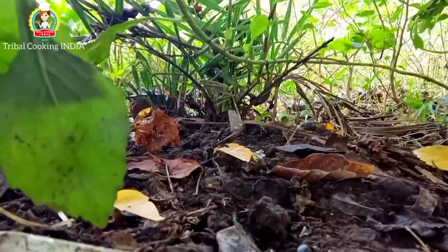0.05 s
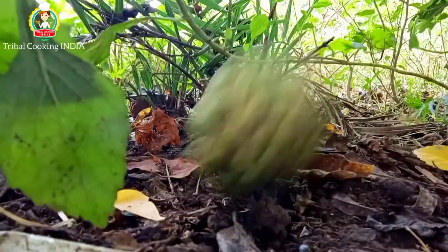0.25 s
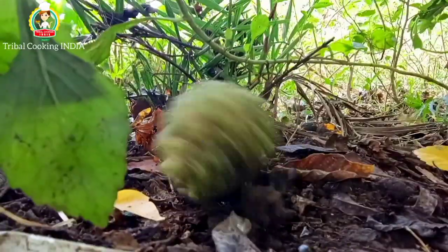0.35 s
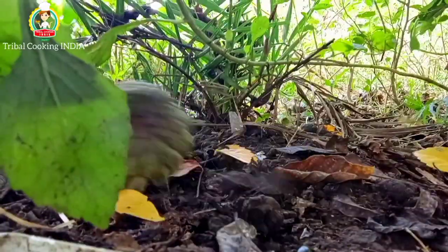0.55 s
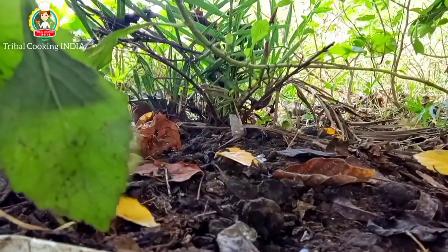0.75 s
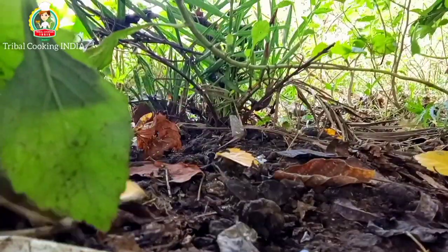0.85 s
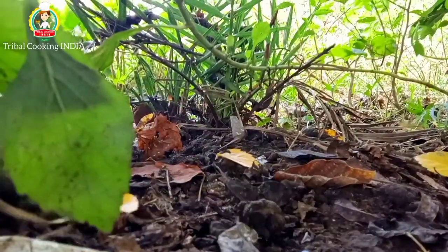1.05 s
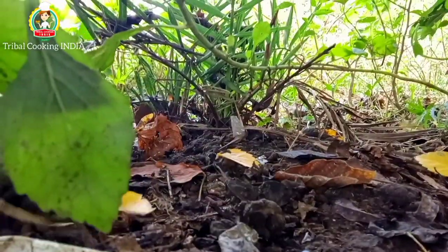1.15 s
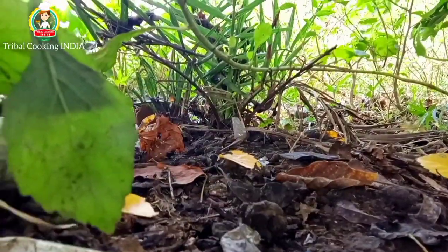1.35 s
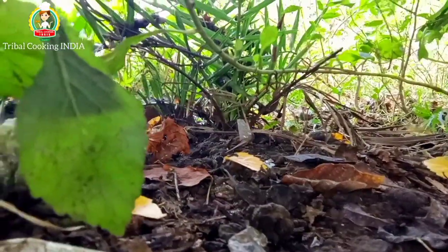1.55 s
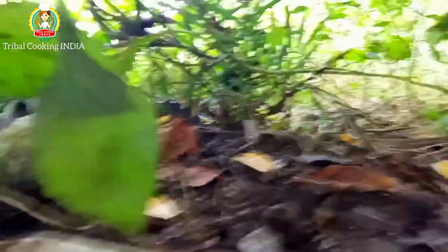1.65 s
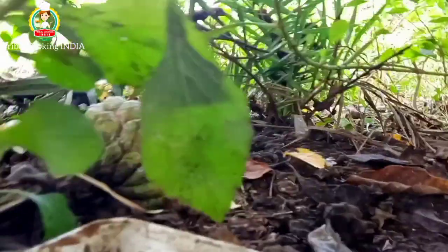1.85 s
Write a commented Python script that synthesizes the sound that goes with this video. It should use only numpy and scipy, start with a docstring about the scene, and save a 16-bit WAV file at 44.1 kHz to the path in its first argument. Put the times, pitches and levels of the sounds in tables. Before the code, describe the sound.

A heavy fruit thuds onto soil close by at about 0.2 seconds, the loudest sound, after a brief rustle of dry leaves. It bounces faintly at 0.4 seconds and rolls off through crunching leaves. Softer rustling continues over a light outdoor wind rumble, with small twig snaps, one clear at 0.8 seconds. Around 1.8 seconds the rustle and rumble swell briefly with a few more snaps.

```python
"""Dry leaves rustle and twigs snap, then a heavy round fruit thuds onto soil close by, bounces once
and rolls off through the litter. The impact excites the fruit's damped modes; each twig fractures
with a ringing crack, and the leaves give noise bursts over a bed of countless tiny cracks.
Light wind and the rolling rumble underneath, and the rustle swells again at the end."""
import sys
import numpy as np
from scipy import signal
from scipy.fft import rfft, irfft
from scipy.io import wavfile

SR = 44100
rng = np.random.default_rng(int(sys.argv[2]) if len(sys.argv) > 2 else 0)


def wav_record(signal):
    """Record a signal, one row per channel, as 16-bit PCM in the file named by sys.argv[1]."""
    frames = np.transpose(np.atleast_2d(signal))
    bounded = np.clip(frames, -1, 1)
    # unit amplitude maps onto the largest positive 16-bit level
    quanta = np.round(bounded * 32767).astype(np.int16)
    wavfile.write(sys.argv[1], SR, quanta)


N = 83790

# spectrum of crushed leaves and splinters (frequency [Hz], relative level [dB])
CRUSH_SPECTRUM = [(100, -31), (450, -22.5), (800, -0.5), (1200, 1.5), (1700, 2.5), (2500, -1.5),
                  (3700, 2.5), (4600, -14.5), (6000, -30.5), (15500, -44)]


def fruit_thud(level_db, slap_db):
    """Impact excites damped modes; the main one drops in pitch and level as the contact load comes off."""
    # overtones of the fruit (frequency [Hz], relative level [dB], 60 dB decay time [s])
    modes = [(305, -18, 0.02), (493, -18, 0.046), (1170, -15.5, 0.017), (1613, -21, 0.037),
             (3320, -29, 0.016)]
    contact_s, rise_s, lag_s, slap_s = 0.012, 0.0011, 0.00072, 0.00014
    pressed_hz, free_hz, free_db, free_t60 = 168.7, 130, -10.5, 0.064
    t = np.arange(SR // 5) / SR
    age = np.maximum(t - lag_s, 0)  # the vibration starts just after the skin's slap
    pressed = .5 - .5 * np.tanh((age - contact_s) / 0.00034)
    hz = free_hz + (pressed_hz - free_hz) * pressed
    phase = 2 * np.pi * np.cumsum(hz * (age > 0)) / SR
    load = .5 - .5 * np.tanh((age - contact_s * 0.86) / 0.001)
    envelope = load + (1 - load) * amp(free_db - 60 * (age - contact_s) / free_t60)
    fundamental = (1 - np.exp(-age / rise_s)) * envelope * np.sin(phase)
    overtones = sum(amp(db - 60 * t / t60) * np.sin(2 * np.pi * f * t) for f, db, t60 in modes)
    pulse = (t / slap_s) ** 2 * np.exp(2 - 2 * t / slap_s)
    slap = signal.sosfilt(signal.butter(3, 2020, fs=SR, output="sos"), pulse)  # soft soil dulls it
    return amp(level_db) * (fundamental - overtones) - amp(slap_db) * slap


def twig_snap(level_db, decay_s, centre_hz):
    """Brittle fracture: a damped oscillation of a few cycles, trailed by the noise of splinters."""
    decay_cycles, splinter_gain = 1.54, 0.52
    t = np.arange(SR // 25) / SR
    crack = np.sin(2 * np.pi * centre_hz * t) * np.exp(-t * centre_hz / decay_cycles)
    splinters = colour(rng.standard_normal(len(t)), CRUSH_SPECTRUM) * np.exp(-t / decay_s)
    band = signal.butter(5, [650, 3900], "bandpass", fs=SR, output="sos")
    return amp(level_db) * signal.sosfilt(band, crack + splinter_gain * splinters)


def leaf_crunch(decay_s, body_db, treble_db, peak_hz):
    """A crushed leaf radiates a noise transient: a dull body and a crisp spectral peak of its own."""
    # treble of a crushed leaf (frequency [Hz], relative level [dB])
    crisp_spectrum = [(2000, 4), (4500, 0), (6500, -6), (9000, 2), (12000, -11), (15500, -13.5)]
    rise_s, peak_db, half_width_hz = 0.0016, 8, 1150
    t = np.arange(SR // 8) / SR
    body, treble = rng.standard_normal((2, len(t)))
    hz = np.fft.rfftfreq(len(t), 1 / SR)
    peak = amp(peak_db / (1 + ((hz - peak_hz) / half_width_hz) ** 2))
    treble = colour(irfft(rfft(treble) * peak, len(t)), crisp_spectrum)
    envelope = np.minimum(t / rise_s, 1) * np.exp(-np.maximum(t - rise_s, 0) / decay_s)
    return envelope * (amp(body_db) * colour(body, CRUSH_SPECTRUM) + amp(treble_db) * treble)


def leaf_rustle():
    """Many leaves add incoherently into a grainy body with a finer crackle on top."""
    # envelope of the rustle (time [s], body level [dB], treble level [dB])
    levels = [(0, -34, -44.5), (.13, -36.5, -47.5), (.21, -36, -45.5), (.25, -33.5, -46), (.28, -34.5, -43),
              (.36, -36, -45.5), (.41, -34, -42.5), (.46, -37.5, -44.5), (0.548, -34, -44), (.60, -42, -50),
              (.69, -42, -54), (.78, -47, -57), (.85, -42, -55), (.92, -44.5, -53.5), (1.03, -41.5, -52),
              (1.14, -45.5, -55), (1.21, -41, -49.5), (1.25, -44, -51.5), (1.32, -38, -50.5),
              (1.38, -44, -58), (1.45, -40.5, -50), (1.58, -38.5, -49), (1.67, -39, -49.5),
              (1.75, -36.5, -48), (1.82, -32.5, -42), (1.86, -36, -47), (1.9, -33.5, -43.5)]
    # spectra of its two layers (frequency [Hz], relative level [dB])
    body_spectrum = [(25, -45), (70, -22), (170, -6), (300, 1), (800, 0), (1300, -2), (2000, -5.5),
                     (2700, -3.5), (3700, -5.5), (4500, -12), (5500, -21.5), (7500, -26.5), (15500, -45)]
    treble_spectrum = [(2500, -4), (5000, -10.5), (6500, -10.5), (7800, -4.5), (8700, 4), (9300, 1),
                       (10000, -7), (12000, -12.5), (13700, -10), (15500, -9)]
    times, body_db, treble_db = np.transpose(levels)
    body = colour(patchy(grains(per_s=2500, spread_db=3.0, wash=0.67)), body_spectrum)
    treble = colour(patchy(grains(per_s=700, spread_db=2.5, wash=0.79)), treble_spectrum)
    return curve(times, body_db) * body + curve(times, treble_db) * treble


def grains(per_s, spread_db, wash):
    """Shot noise: tiny cracks of uneven size over a Gaussian wash of countless smaller ones."""
    size = amp(spread_db * np.minimum(rng.exponential(1, N), 4.5)) * rng.choice([-1, 1], N)
    cracks = unit(size * (rng.random(N) < per_s / SR))
    return np.sqrt(1 - wash ** 2) * cracks + wash * rng.standard_normal(N)


def patchy(x):
    """Random modulation in time and frequency: each leaf sounds briefly in its own narrow band."""
    patch_s, patch_hz, depth_db = 0.025, 513, 2
    spectra = signal.stft(x, nperseg=256, noverlap=192)[2]
    field = rng.standard_normal(spectra.shape[::-1]).T
    for axis, width in enumerate([patch_hz * 256 / SR, patch_s * SR / 64]):  # in bins, in frames
        kernel = np.exp(-(np.arange(-30, 31) / (width / 2)) ** 2)
        field = signal.fftconvolve(field, np.expand_dims(kernel, 1 - axis), "same")
    spectra *= amp(depth_db * unit(field))
    return unit(signal.istft(spectra, nperseg=256, noverlap=192)[1][:N])


def rumble():
    """Wind and rolling make random pressure fluctuations, strongest at low frequencies."""
    # envelope of the rumble (time [s], level [dB])
    levels = [(0, -47), (.3, -44.5), (.44, -40.5), (.49, -50), (.75, -56.5), (.96, -51.5), (1.03, -54.5),
              (1.21, -49.5), (1.3, -52), (1.68, -48), (1.76, -42), (1.82, -32), (1.86, -43), (1.9, -41)]
    # its spectrum (frequency [Hz], relative level [dB])
    spectrum = [(20, -50), (35, -40), (60, -5.5), (100, -4), (150, -2.5), (250, -7.5), (500, -25),
                (2000, -46)]
    return curve(*np.transpose(levels)) * colour(rng.standard_normal(N), spectrum)


def amp(db):
    """Amplitude ratio of a level in decibels."""
    return 10 ** (np.asarray(db) / 20)


def unit(x):
    """Normalisation to rms 1."""
    return x / np.sqrt(np.mean(x ** 2) + 1e-20)


def colour(x, points):
    """Spectral shaping by (frequency [Hz], level [dB]) points, normalised to rms 1."""
    hz, db = np.transpose(points)
    gain = amp(np.interp(np.log(np.fft.rfftfreq(len(x), 1 / SR) + 1), np.log(hz), db))
    return unit(irfft(rfft(x) * gain, len(x)))


def curve(times, db):
    """Amplitude envelope, interpolated in decibels."""
    return amp(np.interp(np.arange(N) / SR, times, db))


def add(mix, start_s, sound):
    """Superposition of a sound on the mix from start_s on."""
    part = mix[max(round(start_s * SR), 0):][:len(sound)]
    part += sound[:len(part)]


def scene():
    """Free field: fruit, twigs, leaves and wind sum without reflections, in mono."""
    # the fruit lands and bounces (time [s], level [dB], skin slap level [dB])
    landings = [(0.2291, -1.5, -4.5), (0.3929, -29.5, -47)]
    # twigs break (time [s], level [dB], splinter decay [s], ring frequency [Hz])
    snaps = [(0.0360, -23.5, 0.0011, 1170), (0.0848, -16, 0.00075, 2220), (0.299, -15, 0.0017, 3670),
             (0.3800, -18.5, 0.0012, 830), (0.8149, -16.5, 0.0026, 3080), (0.868, -28.5, 0.0014, 1090),
             (0.9475, -27, .001, 1900), (1.0145, -28, 0.00064, 2830), (1.2650, -25, 0.00073, 2550),
             (1.4952, -21, 0.00027, 3520), (1.7060, -24.5, 0.001, 2500), (1.8028, -20, 0.0025, 2040),
             (1.8255, -21.5, 0.0032, 2700)]
    # leaves are crushed (time [s], decay [s], body level [dB], treble level [dB], treble peak [Hz])
    crunches = [(0.0305, 0.00099, -47, -36, 13000), (0.0660, 0.0077, -34, -36.5, 13900),
                (0.2281, 0.0034, -25.5, -46, 9000), (0.342, .005, -39, -35, 14500),
                (0.3770, 0.006, -24, -39.5, 8500), (0.4260, 0.01, -38.5, -38, 10100),
                (0.4809, 0.016, -33, -39.5, 8000), (0.616, 0.0043, -36.5, -37.5, 7840),
                (0.7005, 0.015, -57, -41, 13600), (0.8635, .011, -35.5, -36, 9300),
                (1.0390, 0.018, -39, -44, 8400), (1.2640, 0.0039, -35, -37, 8400),
                (1.2820, 0.0085, -39, -37, 13800), (1.527, .013, -47, -41.5, 13700),
                (1.696, 0.0042, -29, -46, 9000), (1.853, 0.0079, -36, -33, 13000)]
    mix = leaf_rustle() + rumble()
    for events, source in [(landings, fruit_thud), (snaps, twig_snap), (crunches, leaf_crunch)]:
        for start_s, *settings in events:
            add(mix, start_s, source(*settings))
    return mix[None]


def record(dry):
    """Band limiting: a linear-phase low-pass removes the highest treble."""
    cutoff_hz = 15600
    lowpass = signal.firwin(511, cutoff_hz, window=("kaiser", 9), fs=SR)
    return signal.oaconvolve(dry, lowpass[None], "same")


dry = scene()
out = record(dry)
wav_record(out)
```